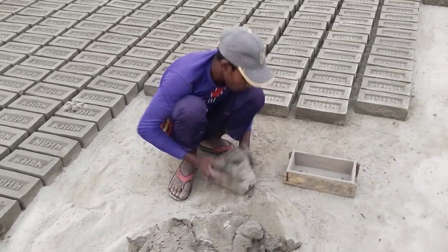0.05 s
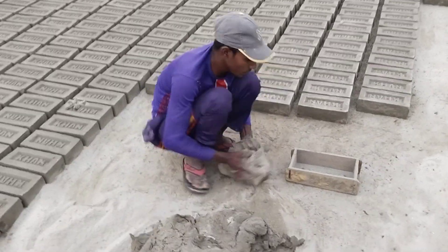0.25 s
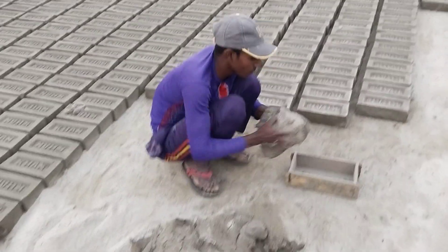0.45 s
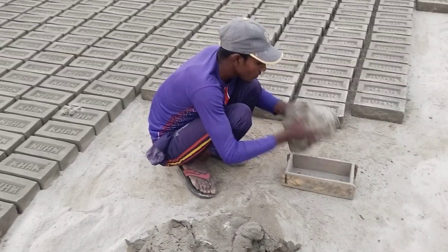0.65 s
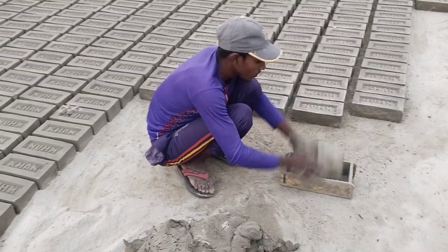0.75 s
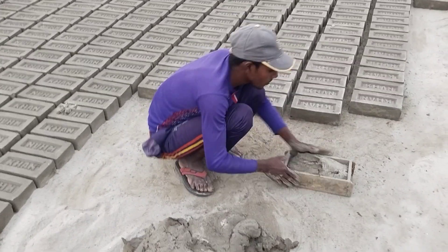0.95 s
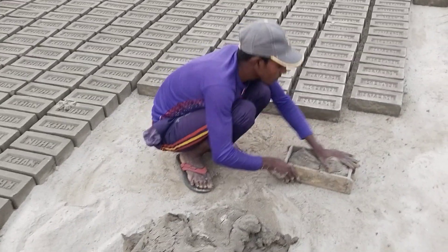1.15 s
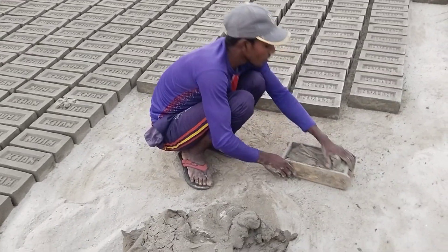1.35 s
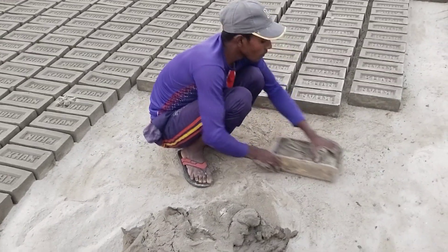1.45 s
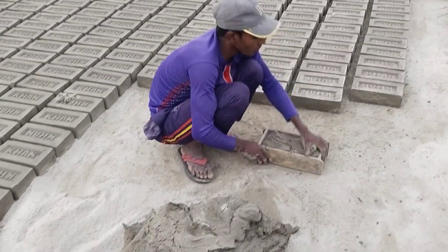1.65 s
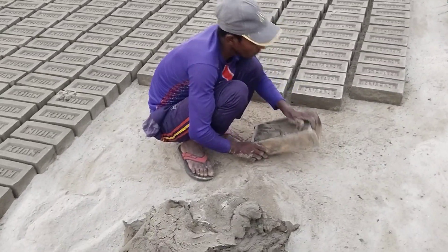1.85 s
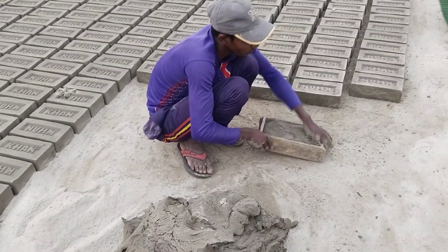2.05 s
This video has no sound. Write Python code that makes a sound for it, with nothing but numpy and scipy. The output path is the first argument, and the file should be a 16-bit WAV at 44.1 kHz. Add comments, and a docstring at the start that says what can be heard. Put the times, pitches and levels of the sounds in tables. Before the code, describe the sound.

Close by in the open air, a lump of wet clay lands with one heavy slap. Softer plops follow as it drops into a wooden mould, then dull knocks and gritty scrapes, with faint wind and a far engine behind.

```python
"""Wet clay for a brick is rolled in sand, slapped down, then dropped into a wooden mould.
Trapped air pops under the clay. The mould, pressed and shaken, knocks in its damped modes
and scrapes on sandy ground. Light wind, a far engine and faint chirps lie behind;
brick rows return dull echoes, and automatic gain ducks on the slap."""
import sys
import numpy as np
from scipy import signal
from scipy.fft import rfft, irfft
from scipy.io import wavfile
from scipy.ndimage import uniform_filter1d

SR = 44100
rng = np.random.default_rng(int(sys.argv[2]) if len(sys.argv) > 2 else 0)


def persist_wave(psi):
    """Save psi, clipped to +-1, as 16-bit WAV."""
    counts = np.round(np.clip(psi, -1, 1) * 32767).astype(np.int16)
    wavfile.write(sys.argv[1], SR, np.atleast_2d(counts).T)


N = 92610
T = np.arange(N) / SR
HIT_T = T[:8192]

# wet clay splat spectrum: freq_hz, level_db
SPLAT_SPECTRUM = [(150, -5), (520, 4.5), (720, 2.5), (1080, 3.5), (1450, 2), (1750, -11.5), (2150, -4),
                  (3200, -34), (12000, -72)]
# sprayed or crushed sand spectrum: freq_hz, level_db
GRIT_SPECTRUM = [(500, -30), (2000, 2.5), (3000, -2.5), (4000, -1), (5000, 5), (7200, 1.5), (8500, -13),
                 (11000, -34), (15000, -40)]
# sliding sand spectrum: freq_hz, level_db
HISS_SPECTRUM = [(1000, 1), (2500, 1), (4000, -0.5), (5400, 4), (7000, 4), (8200, -9), (10000, -26),
                 (11000, -57)]


def amp(db):
    """Decibels to gain."""
    return 10 ** (np.asarray(db) / 20)


def unit(x):
    """Scale to rms 1."""
    return x / np.sqrt(np.mean(x ** 2) + 1e-20)


def add(mix, start_s, sound):
    """Mix a sound in at start_s."""
    part = mix[round(start_s * SR):][:len(sound)]
    part += sound[:len(part)]


def colour(x, spectrum):
    """Filter by (freq_hz, level_db) points; rms 1."""
    hz, db = np.transpose(spectrum)
    bins_hz = np.fft.rfftfreq(len(x), 1 / SR)
    gain = amp(np.interp(np.log(bins_hz + 1), np.log(hz), db))
    return unit(irfft(rfft(x) * gain, len(x)))


def band(centre_hz, width_hz):
    """Noise in one resonance, rms 1; a random drift if centred on 0 Hz."""
    hz = np.fft.rfftfreq(N, 1 / SR)
    gain = (hz > 0) / (1 + (2 * (hz - centre_hz) / width_hz) ** 2)
    return unit(irfft(rfft(rng.standard_normal(N)) * gain, N))


def decay(t60_s, rise_s):
    """Linear attack, exponential decay."""
    return np.minimum(HIT_T / rise_s, 1) * amp(-60 * HIT_T / t60_s)


def ring(hz, t60_s, rise_s, glide_hz_per_s=0):
    """One decaying mode."""
    return decay(t60_s, rise_s) * np.sin(2 * np.pi * (hz + glide_hz_per_s * HIT_T / 2) * HIT_T)


def burst(spectrum, t60_s, rise_s):
    """Decaying puff of noise."""
    return colour(rng.standard_normal(len(HIT_T)), spectrum) * decay(t60_s, rise_s)


def swell(start_s, rise_s, fall_s):
    """Rounded rise and fall."""
    corners_s = [start_s, start_s + rise_s, start_s + rise_s + fall_s]
    return np.sin(np.pi / 2 * np.interp(T, corners_s, [0, 1, 0]))


def wind(level_db=-44, flutter_db=1.5):
    """Light wind: low noise of wavering level."""
    # open air: freq_hz, level_db
    air_spectrum = [(20, -29), (45, -17), (70, 14), (115, 2), (165, -7), (250, -1), (380, -1.5), (480, 4),
                    (580, -17), (740, -19.5), (930, -5.5), (1150, -10.5), (1420, -12), (1600, -14),
                    (2150, -8.5), (3200, -15), (6000, -17), (6900, -14.5), (8200, -23), (10000, -42.5),
                    (11000, -73)]
    return amp(level_db - flutter_db * band(0, 18.3)) * colour(rng.standard_normal(N), air_spectrum)


def far_engine(shaft_hz=18.25, wander=0.0031):
    """Harmonics of a wandering shaft speed, with fluttering hums and a noisy drone."""
    # shaft harmonics: order, rms_db
    harmonics = [(4, -47), (5, -56), (7, -61.5), (8, -49), (14, -57.5), (18, -58)]
    # hum tones: pitch_hz, level_db
    hum_tones = [(112, -48), (135.5, -50.5), (444, -58.5)]
    # drone resonances: centre_hz, width_hz, rms_db
    resonances = [(804, 47, -61), (930, 24, -60), (1414, 42, -59.5)]
    turns = np.cumsum(shaft_hz * (1 + wander * band(0, 2.74))) / SR
    engine = sum(amp(db) * np.sin(2 * np.pi * (round(k) * turns + rng.random())) for k, db in harmonics)
    hums = sum(amp(db) * np.sin(2 * np.pi * (hz * T + rng.random())) * amp(2 * band(0, 12))
               for hz, db in hum_tones)
    drone = sum(amp(db) * band(hz, width_hz) for hz, width_hz, db in resonances)
    return np.sqrt(2) * (engine + hums) + drone


def chirps():
    """Faint, thin whistles, perhaps a far bird."""
    # whistles: start_s, length_s, level_db
    calls = [(1.305, .04, -55), (1.43, .05, -51), (1.525, .06, -53)]
    envelope = sum(amp(db) * swell(start_s, length_s / 2, length_s / 2) for start_s, length_s, db in calls)
    return band(centre_hz=5850, width_hz=17) * envelope


def brick_echoes(x, count=60, level_db=-32.5, cutoff_hz=700):
    """Faint, dull reflections off rows of bricks."""
    impulse = np.zeros(len(HIT_T))
    signs = rng.choice([-1, 1], count)
    delays_s = rng.uniform(0.035, 0.078, count)
    impulse[(delays_s * SR).astype(int)] = signs / np.sqrt(count)
    dulled = signal.lfilter(*signal.butter(2, cutoff_hz, fs=SR), impulse)
    return amp(level_db) * signal.fftconvolve(x, dulled)[:N]


def grains(spectrum, rate_per_s=7000, spread_db=2, clump_db=2.5, clump_hz=120):
    """Sand grains of mixed size, catching in clumps."""
    size_db = spread_db * np.minimum(rng.exponential(1, N), 4) + clump_db * band(0, clump_hz)
    clicks = rng.choice([-1, 1], N) * (rng.random(N) < rate_per_s / SR)
    return colour(amp(size_db) * clicks, spectrum)


def sand_scrapes(pivot_hz=6450):
    """Clay, hands and mould slide on sand: hiss, tilted per stroke, over a duller rub."""
    # slides: start_s, rise_s, fall_s, hiss_db, tilt_db_per_octave, rub_db
    strokes = [(-.06, 0.099, 0.17, -54, 6, -41.5), (0.132, 0.17, 0.035, -50, 16.5, -45.5),
               (0.318, 0.044, 0.1, -53, 5, -47), (0.605, 0.066, 0.054, -45.5, 11.5, -46.5),
               (.74, 0.062, 0.059, -65, -17, -49), (0.879, 0.0082, 0.036, -43, 14, -69),
               (.93, 0.015, 0.087, -52.5, 5, -40), (1.05, 0.038, 0.11, -49, 2.5, -51),
               (1.14, 0.082, 0.22, -64, -8, -47), (1.408, 0.012, 0.01, -43.5, 6, -66),
               (1.435, 0.018, 0.026, -44.5, 2, -52), (1.472, 0.044, 0.1, -45, 3, -41),
               (1.57, 0.061, 0.05, -40.5, 5, -57), (1.65, 0.049, 0.38, -55, -11, -47),
               (1.776, 0.019, 0.024, -49.5, -1, -57)]
    # dull friction: freq_hz, level_db
    rub_spectrum = [(20, -41), (50, 11.5), (130, 12.5), (300, 11), (500, 7), (700, -5), (1400, 2),
                    (2200, -6.5), (4000, -8.5), (8000, -23), (11000, -68)]
    out = np.zeros(N)
    hiss, rub = grains(HISS_SPECTRUM), grains(rub_spectrum)
    for start_s, rise_s, fall_s, hiss_db, tilt, rub_db in strokes:
        tilted = colour(hiss, [(pivot_hz / 2, -tilt), (pivot_hz * 2, tilt)])
        out += swell(start_s, rise_s, fall_s) * (amp(hiss_db) * tilted + amp(rub_db) * rub)
    return out


def sand_shower(start_s=0.625, rise_s=0.12, fall_s=0.061, level_db=-46, top_hz=9470, sag_hz_per_s=25000):
    """Sand thrown off by the dropped clay; its hiss sinks in pitch."""
    centre_hz = top_hz - sag_hz_per_s * np.clip(T - start_s, 0, rise_s + fall_s)
    sweep = band(0, width_hz=3500) * np.sin(2 * np.pi * np.cumsum(centre_hz) / SR)
    return amp(level_db) * swell(start_s, rise_s, fall_s) * colour(sweep, HISS_SPECTRUM)


def sand_squeaks(length_s=0.021):
    """Narrow-band stick-slip as the mould starts to move."""
    # slips: start_s, level_db
    slips = [(1.431, -43), (1.447, -42)]
    squeal = colour(band(centre_hz=6930, width_hz=390), HISS_SPECTRUM)
    return squeal * sum(amp(db) * swell(start_s, length_s / 2, length_s / 2) for start_s, db in slips)


def taps(cutoff_hz=8000):
    """Grain snaps, mould contacts, palm pats: one pressure peak between two dips; narrower is brighter."""
    # contacts: centre_s, level_db, width_s
    contacts = [(0.1904, -21, 0.0015), (0.9416, -19.5, 0.00023), (1.0223, -17.5, 0.000048),
                (1.5184, -20, 0.00016), (1.52, -21.5, 0.00036), (1.6796, -26.5, .0017)]
    out = np.zeros(N)
    for centre_s, db, width_s in contacts:
        u = (T - centre_s) / width_s
        out += amp(db) * (1 - 2 * u ** 2) * np.exp(-u ** 2)
    return signal.lfilter(*signal.butter(6, cutoff_hz, fs=SR), out)


def mould_knocks(rise_s=0.00068, cutoff_hz=6950):
    """The mould rings, thuds on the ground and crushes grit; clay softens the contact."""
    # damp wood modes: freq_hz, level_db, t60_s
    modes = [(354, -0.5, 0.066), (468, 3, 0.048), (583, 4.5, 0.042), (810, -7.5, 0.073), (926, -5.5, 0.067),
             (1074, -3, 0.05), (1410, 4, 0.016), (1728, -5, 0.049), (1900, -5, 0.053), (2770, -6, .015),
             (3750, 2.5, 0.016), (4420, 3.5, 0.014)]
    # knocks: start_s, wood_db, centre_hz, falloff_db_per_octave_squared, thud_db, thud_hz, grit_db
    knocks = [(0.917, -22, 620, 22, -48, 270, -44), (0.9318, -27.5, 1300, 4, -39, 270, -48),
              (.941, -18.5, 1500, 1.5, -22, 267, -40), (0.9646, -21.5, 1810, 9, -35, 270, -39),
              (1.414, -33.5, 810, 47, -28.5, 263, -43), (1.5189, -25, 960, 14.5, -15.5, 512, -28.5),
              (1.5236, -22.5, 473, 17, -24.5, 156, -56), (1.738, -27, 1130, 20, -21.5, 346, -52),
              (1.746, -30, 890, 26, -28, 340, -61), (1.771, -44, 950, 12, -27.5, 327, -62),
              (1.786, -32.5, 585, 54, -51, 267, -38.5), (1.899, -30, 1300, 14, -57, 270, -58)]
    body, grit = np.zeros((2, N))
    mode_hz, mode_db, mode_t60_s = np.transpose(modes)
    for start_s, wood_db, centre_hz, falloff, thud_db, thud_hz, grit_db in knocks:
        weights = amp(mode_db - falloff * np.log2(mode_hz / centre_hz) ** 2)
        weights /= np.linalg.norm(weights)
        wood = sum(weight * rng.choice([-1, 1]) * ring(hz, t60_s, rise_s)
                   for weight, hz, t60_s in zip(weights, mode_hz, mode_t60_s))
        thud = ring(thud_hz, t60_s=0.034, rise_s=rise_s)
        add(body, start_s, amp(wood_db) * wood + amp(thud_db) * thud)
        add(grit, start_s, amp(grit_db) * burst(GRIT_SPECTRUM, t60_s=0.042, rise_s=rise_s))
    return signal.lfilter(*signal.butter(4, cutoff_hz, fs=SR), body) + grit


def clay_plops():
    """Clay settles with small hollow pops and wet splats."""
    # soft landings: start_s, pop_db, pitch_hz, t60_s, splat_db
    landings = [(0.191, -23, 202, 0.18, -45), (0.5827, -19.5, 430, 0.051, -38),
                (0.598, -25, 232, 0.021, -41), (.607, -28.5, 576, 0.19, -58), (.621, -15, 218, 0.032, -36),
                (.630, -22, 430, 0.052, -55), (.637, -37.5, 585, 0.073, -56),
                (1.679, -29.5, 223, 0.029, -61)]
    out = np.zeros(N)
    for start_s, pop_db, pitch_hz, t60_s, splat_db in landings:
        pop = amp(pop_db) * ring(pitch_hz, t60_s, rise_s=0.0023)
        splat = amp(splat_db) * burst(SPLAT_SPECTRUM, t60_s=0.075, rise_s=0.0004)
        add(out, start_s, pop + splat)
    return out


def clay_slap(splat_s=0.223, first_pulse_s=0.2243, pocket_s=0.2325, highpass_hz=76):
    """A low thump of three quick pressure pulses, with sand spray and a splat; trapped air then rings."""
    pulse_gap_s, pulse_width_s, spray_lead_s = 0.004055, 0.00054, 0.0012
    out = np.zeros(N)
    for k, (pulse_db, spray_db) in enumerate([(0.5, -14), (1.3, -19), (2.1, -24)]):
        pulse_s = first_pulse_s + k * pulse_gap_s
        u = (T - pulse_s) / pulse_width_s
        out -= amp(pulse_db) * u * np.exp((1 - u ** 2) / 2)  # pressure peak, then dip
        spray = amp(spray_db) * burst(GRIT_SPECTRUM, t60_s=0.021, rise_s=0.00043)
        add(out, pulse_s - spray_lead_s, spray)
    thud = amp(-20) * ring(hz=227, t60_s=0.12, rise_s=0.0064)
    splat = amp(-5.5) * burst(SPLAT_SPECTRUM, t60_s=0.058, rise_s=0.0035)
    add(out, splat_s, thud + splat)
    pop = amp(9.5) * ring(hz=371, t60_s=0.06, rise_s=0.0027, glide_hz_per_s=1300)
    tail = amp(-16.5) * ring(hz=385, t60_s=0.22, rise_s=0.0027)
    add(out, pocket_s, pop + tail)
    return signal.lfilter(*signal.butter(2, highpass_hz, "high", fs=SR), out)


def scene():
    """Close work, its echoes and the background; mono."""
    work = clay_slap() + clay_plops() + mould_knocks() + taps()
    work += sand_scrapes() + sand_shower() + sand_squeaks()
    return (work + brick_echoes(work) + far_engine() + wind() + chirps())[None]


def record(dry, threshold_db=-17.5, duck_db_per_db=0.42, release_db_per_s=78, cutoff_hz=15700):
    """Automatic gain ducks on the slap and recovers; then a low-pass."""
    power_db = 10 * np.log10(abs(uniform_filter1d(dry[0] ** 2, size=200)) + 1e-12)
    release_db = T * release_db_per_s
    held_db = np.maximum.accumulate(power_db + release_db) - release_db  # decaying peak hold
    over_db = np.maximum(held_db - threshold_db, 0)
    ducked = dry / amp(duck_db_per_db * uniform_filter1d(over_db, size=100))
    lowpass = signal.firwin(511, cutoff_hz, window=("kaiser", 9), fs=SR)
    return signal.oaconvolve(ducked, lowpass[None], "same")


dry = scene()
out = record(dry)
persist_wave(out)
```